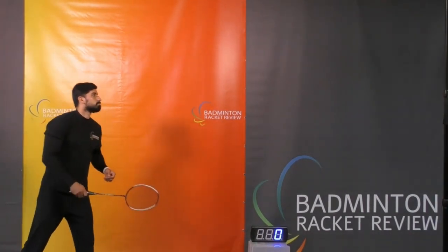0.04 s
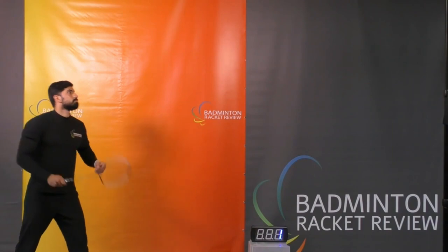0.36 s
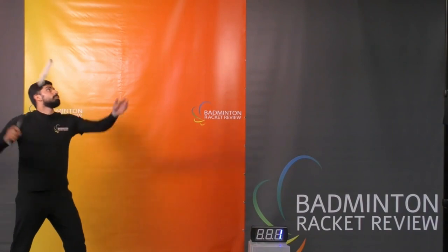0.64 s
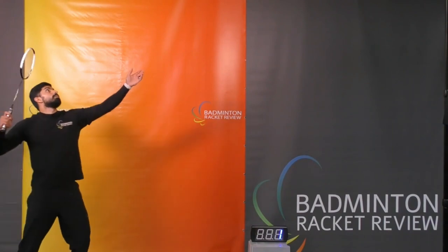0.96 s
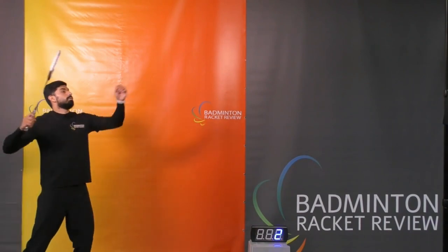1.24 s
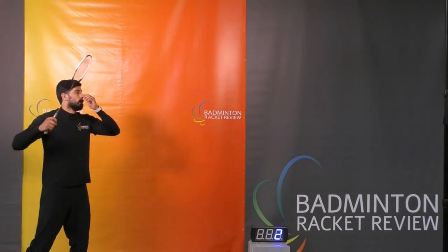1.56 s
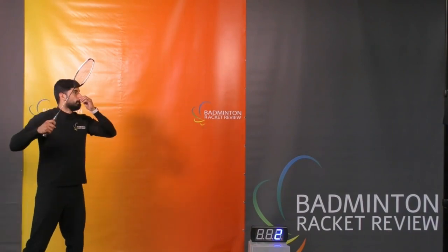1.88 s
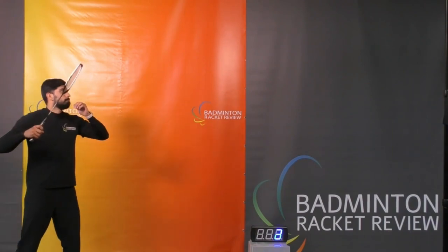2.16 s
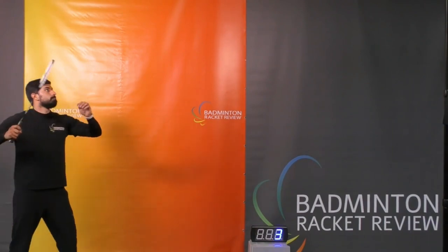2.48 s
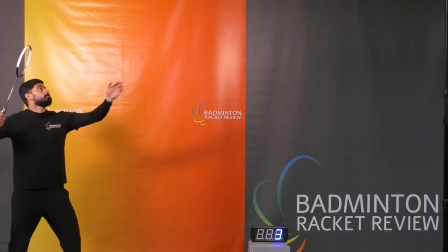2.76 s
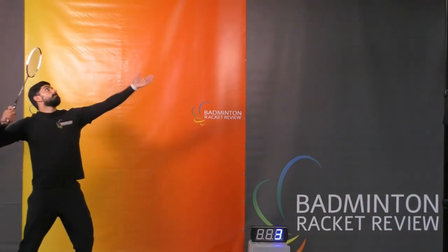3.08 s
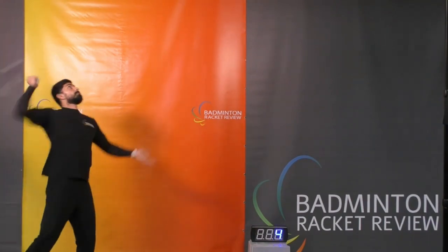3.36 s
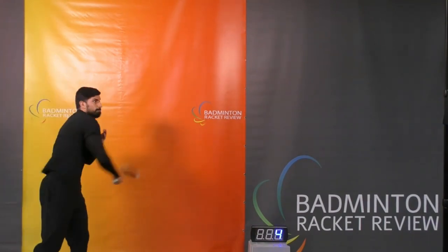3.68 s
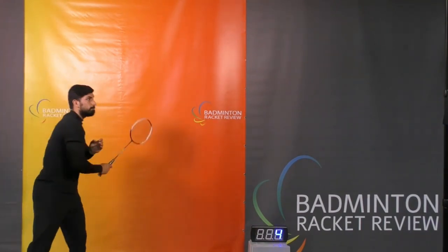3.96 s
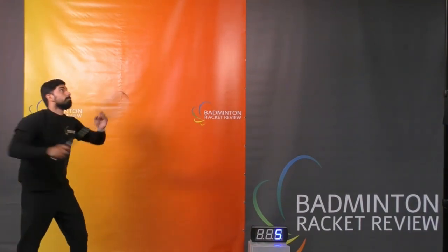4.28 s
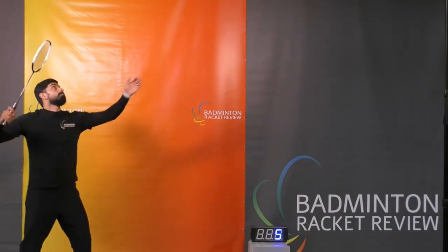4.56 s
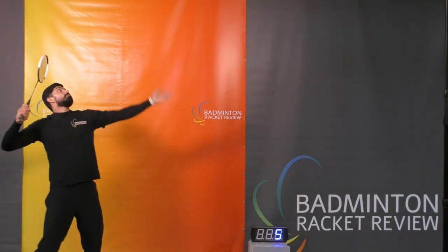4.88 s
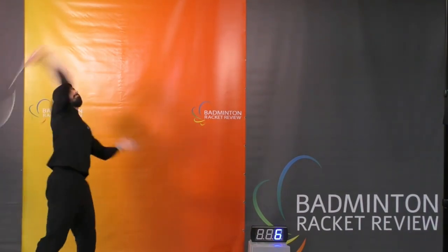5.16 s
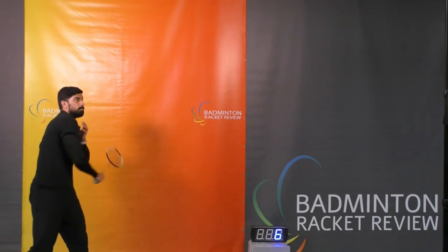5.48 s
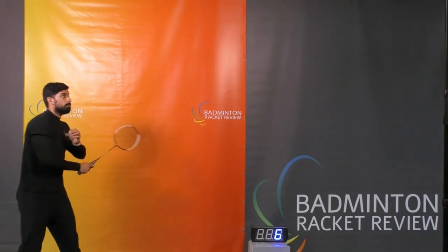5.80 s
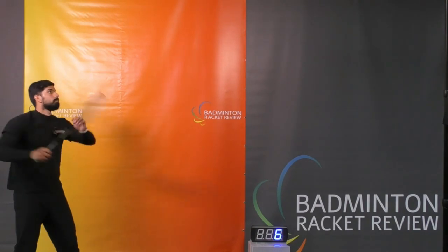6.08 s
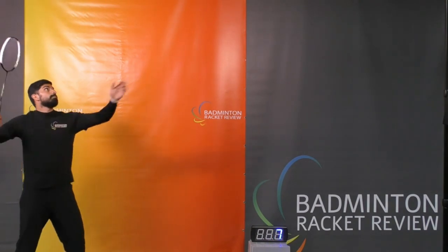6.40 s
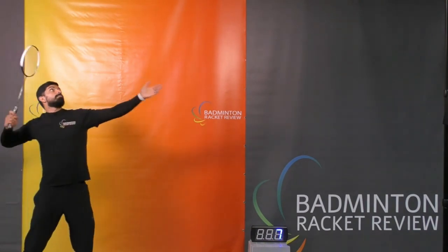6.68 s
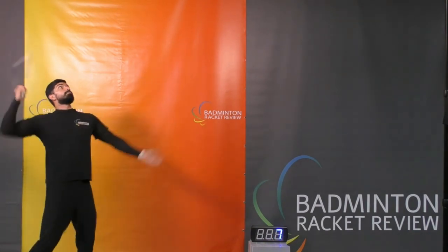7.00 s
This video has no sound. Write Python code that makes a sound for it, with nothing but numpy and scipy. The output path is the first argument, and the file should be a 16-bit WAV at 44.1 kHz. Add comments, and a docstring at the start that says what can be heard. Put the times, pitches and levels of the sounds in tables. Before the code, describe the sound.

A badminton player stamps on a sprung floor and cracks two loud smashes in a large, humming indoor hall.

```python
"""Ventilation hums in a large, echoing sports hall, and a badminton player stamps into position.
Footfalls excite the damped resonances of a sprung floor; a shuttle feeder whirrs, launches and clinks.
After a dull knock, the racket whistles by vortex shedding and cracks in two smashes; shuttles land.
Each crack overloads a close mono microphone, whose gain ducks and creeps back while the hall rings."""
import sys
import numpy as np
from scipy import signal
from scipy.fft import rfft, irfft, next_fast_len
from scipy.io import wavfile
from scipy.ndimage import uniform_filter1d

SR = 44100
rng = np.random.default_rng(int(sys.argv[2]) if len(sys.argv) > 2 else 0)


def inscribe(sig):
    """Save sig as 16-bit PCM at rate SR to the path in sys.argv[1].

    A 1-D sig is mono; a 2-D sig holds one channel per row.
    Samples are clipped to [-1, 1] before scaling.
    """
    pcm = np.round(np.clip(np.atleast_2d(sig).T, -1, 1) * 32767)
    wavfile.write(sys.argv[1], SR, pcm.astype(np.int16))


N = 319284
TIME = np.arange(N) / SR

# Spectra. Each row: frequency in Hz, relative level in dB.
VENT_SPECTRUM = [(20, -10), (55, -31), (85, -3.5), (125, 5.5), (200, 3), (310, -7.5), (400, -22.5),
                 (470, -31), (600, -32), (1100, -27), (2600, -18.5), (4200, -19.5), (5200, -23),
                 (6500, -25), (8000, -22), (9800, -19.5), (13000, -29), (16000, -41)]  # turbulent air from the fans
SOLE_SPECTRUM = [(200, 11), (450, -7), (1200, -1.5), (1800, -3.5), (2150, -9), (2600, -5), (3500, -7),
                 (6500, -6), (9500, 2.5), (12000, 0.5), (16000, -12.5)]  # a sole slapping the court
CRACK_SPECTRUM = [(200, -25), (470, 0.5), (720, -2), (1100, -8.5), (2400, 0), (3200, -1.5), (4100, 2.5),
                  (5400, -2), (6800, 3), (8200, 5), (10000, 9.5), (12500, 9), (16000, 4)]  # a sharp crack
HISS_SPECTRUM = [(40, 1), (200, 21), (450, -12), (700, 7), (1500, -2), (3500, 0), (6500, 3.5), (8200, 6),
                 (10500, 0), (14500, 8), (16000, -15)]  # air passing strings or feathers
CORK_SPECTRUM = [(60, -8), (170, 21), (400, 1.5), (850, -9.5), (1250, 15.5), (1500, 7), (1850, 11),
                 (2400, 9), (3000, -11), (4300, -1), (6000, -12), (10000, -12), (16000, -38)]  # cork striking the floor
RUBBER_SPECTRUM = [(300, -1), (700, 0.5), (1500, -2.5), (4000, 0), (6500, -1), (8500, 5), (11000, 6),
                   (13000, -1), (16000, -14)]  # rubber rubbing
WHEEL_SPECTRUM = [(1200, 2.5), (1900, 10), (2150, 21), (2550, 16.5), (3000, 1), (5000, -36)]  # the feeder's spinning wheels
RATTLE_SPECTRUM = [(1500, -10.5), (6700, -11), (7800, 0), (8600, -3), (9300, -3), (11000, -2.5),
                   (12300, -8), (13500, -15), (16000, -22)]  # a small metal part rattling
HALL_SPECTRUM = [(60, -35), (125, 3), (250, 3.5), (350, 5), (420, -3), (470, -12), (550, 0.5), (660, 9.5),
                 (820, -7.5), (1050, 5.5), (10000, 1), (15000, -2.5)]  # the reverberant field
# Reverberation time of the hall. Each row: frequency in Hz, T60 in seconds.
HALL_DECAY = [(120, 1.43), (400, 1.15), (1100, 2.89), (2300, 2.25), (4500, 1.66), (7000, 1.18),
              (10000, 0.84), (15000, 0.35)]
# Steady background drones of the hall. Each row: frequency in Hz, width in Hz, level in dB.
HALL_DRONES = [(133.2, 17.5, -41.5), (656, 196, -59), (1027, 120, -62), (2135, 56, -57.5), (3795, 270, -59)]
# Pings at the first stamp. Each row: start in seconds, frequency in Hz, level in dB, T60 in seconds.
STAMP_PINGS = [(0.2078, 2121, -25, .032), (0.2135, 1390, -27, .022)]
# Stamps that push the player back into position. Each row: start in seconds, level in dB.
FOOT_STAMPS = [(0.2086, -9), (2.3228, -9.5), (3.974, -12), (5.917, -8.5)]
# A thump's arrivals off floor and walls. Each row: delay in seconds, relative level in dB.
THUMP_PATHS = [(0, -3), (.0275, -6.5), (0.063, -5), (.0755, -9.5)]
# Soft low thuds: steps, and thuds with the feeder's launches and the last swing.
# Each row: centre in seconds, level in dB, pitch in Hz, half-width in seconds.
SOFT_THUDS = [(0.216, -25, 268, 0.0047), (0.98, -20, 203, 0.007), (1.337, -25, 133, 0.007),
              (1.678, -19.5, 157, 0.0074), (1.718, -20.5, 143.4, 0.011), (1.8465, -24.5, 179, 0.016),
              (3.5435, -22, 155, 0.01), (3.913, -24.5, 206, 0.021), (4.065, -21.5, 147.1, 0.013),
              (4.16, -28, 181, 0.006), (4.965, -29.5, 270, 0.0069), (5.028, -24.5, 150, 0.0091),
              (6.334, -25, 161, 0.022), (6.819, -29.5, 260, 0.0078), (7.226, -23, 188, 0.01)]
# Sharp cracks: first a duller knock close by, then two racket smashes.
# Each row: start in seconds, level in dB, decay in seconds (0.0006 at least is used),
# treble tilt in dB per octave, buzz in dB, hall level in dB, hall tilt in dB per octave,
# early reflections in dB, far-end swell as a ratio, reflection gap in seconds, bounce lag in seconds.
SHARP_CRACKS = [(0.7536, -18, 0.0083, -7, -27.5, -12.5, -5.5, -11, 0.59, 0.038, 0.0012),
                (3.575, 4, 0.00088, 8.5, -21, 2, 2.5, 4, 0.21, 0.02, 0.0012),
                (5.2950, 9, 0.00043, 4.5, -12.5, 1, -1.46, 8, 0.051, .0184, 0.00091)]
# Air displaced with each crack. Each row: centre in seconds, half-width in seconds,
# then suction, pressure and wake as signed amplitudes.
PRESSURE_PULSES = [(0.7595, 0.0012, 0.32, -2.13, -0.13), (3.5787, 0.00083, -0.083, 0.41, -0.26),
                   (5.2987, 0.0014, -0.18, 1.9, 0.88)]
# String-bed modes; in a smash the point of impact decides which speak. Each row: frequency in Hz,
# width in Hz, then lift in dB for the knock, the first smash and the second smash.
STRING_BED_MODES = [(1059, 110, 0, 23, 13), (1410, 69, -5, 25, 15.5), (1660, 120, -8, 7.3, 22),
                    (2104, 160, -10, 23, 6), (2420, 300, -14, 7.7, -3), (2830, 180, -8, 21, 14),
                    (3570, 100, -1, 16, -5), (4030, 210, 1, 1.7, 12), (4580, 200, -7, 13, 2),
                    (4804, 570, 11.5, 8.5, -1), (5380, 350, 10, 16, 19.5), (6060, 370, 6, 11, 5),
                    (6840, 400, 0, 10, 4), (8200, 730, 8, 9.7, 6), (9180, 980, -3, 6, 15),
                    (10280, 310, 7.5, 7.7, 1.5), (12200, 850, -5, 7, -16)]
# Shuttles landing near and far. Each row: start in seconds, level in dB,
# treble tilt in dB per octave, hall level in dB.
SHUTTLE_LANDINGS = [(0.95, -32, -3, -31.5), (1.8909, -18.5, -2, -20.5), (1.9004, -27, 23, -25),
                    (3.754, -56, -3, -13.5), (3.896, -38, -14, -13.5), (5.62, -66, 2.5, -19)]
# Modes of struck objects. Each row: frequency in Hz, relative level in dB, T60 in seconds.
CORK_RESONANCES = [(1380, -31, 0.02), (1803, -28, 0.033)]
METAL_RESONANCES = [(7920, 6, .12), (8400, -3, .16), (8530, 6, .2), (8670, -1, .16), (12200, 0, .2)]
# Feeder launches. Each row: start in seconds, hiss in dB, whirr in dB, time of peak whirr in seconds.
LAUNCHES = [(1.191, -36, -48.5, 1.33), (3.071, -31, -48, 3.12), (4.927, -29, -46, 4.87),
            (6.773, -30.5, -43.5, 6.76)]
# Clinks of the reloading feeder. Each row: start in seconds, rattle in dB, ring in dB.
RELOADS = [(1.629, -33.5, -38), (3.493, -35.5, -39), (5.343, -18, -48), (7.188, -34, -36)]
# Racket swings. Each row: time of top speed in seconds, level in dB, top pitch of the shaft in Hz.
RACKET_SWINGS = [(3.575, -22, 1130), (5.294, -20, 1100), (7.239, -21.5, 955)]


def amp(db):
    """Converts decibels to an amplitude ratio."""
    return 10 ** (np.asarray(db) / 20)


def unit_rms(x):
    """Normalises a signal to unit power."""
    return x / np.sqrt(np.mean(x ** 2) + 1e-20)


def curve(points, hz):
    """Interpolates a table along a logarithmic frequency axis."""
    f, value = np.transpose(points)
    return np.interp(np.log(hz + 1), np.log(f + 1), value)


def add(mix, s, sound):
    """Superposes a sound on the mix from s seconds on."""
    part = mix[round(s * SR):][:len(sound)]
    part += sound[:len(part)]


def gains(spectrum, size, tilt_db):
    """Frequency response per FFT bin, the treble tilted by tilt_db per octave."""
    hz = np.fft.rfftfreq(size, 1 / SR)
    return amp(curve(spectrum, hz) + tilt_db * np.log2(1 + hz / 2000))


def noise(spectrum, size, tilt_db=0):
    """White noise filtered to a given spectrum, at unit power."""
    white = rfft(rng.standard_normal(size))
    return unit_rms(irfft(white * gains(spectrum, size, tilt_db), size))


def click(spectrum, tilt_db=0, size=512):
    """A blow as the hall receives it: an impulse with the energy of one millisecond at full scale."""
    pulse = np.roll(irfft(gains(spectrum, size, tilt_db)), size // 16)
    return pulse / np.linalg.norm(pulse) * np.sqrt(.001 * SR)


def narrowband(hz, width):
    """Random modulation spreads a steady or gliding carrier into a band of noise."""
    size = next_fast_len(N)
    offset = np.fft.fftfreq(size, 1 / SR)
    band = np.exp(-2 * (offset / width) ** 2)
    waver = np.fft.ifft(np.fft.fft(rng.standard_normal(size)) * band)[:N]
    carrier = np.exp(2j * np.pi * np.cumsum(hz * np.ones(N)) / SR)
    return unit_rms((waver * carrier).real)


def burst(spectrum, decay_s, rise_s, tilt_db=0):
    """Exponentially decaying noise whose energy depends only on its envelope."""
    t = TIME[:SR // 2]
    envelope = (1 - np.exp(-t / rise_s)) * np.exp(-t / decay_s)
    return unit_rms(noise(spectrum, len(t), tilt_db) * envelope) * np.sqrt(np.mean(envelope ** 2))


def ringing(modes):
    """Free vibration: a sum of damped sinusoids."""
    t = TIME[:SR // 2]
    return sum(amp(db - 60 * t / t60) * np.sin(2 * np.pi * hz * t) for hz, db, t60 in modes)


def boom(s, hz, half_width_s, overtone=1.73, overtone_db=-17):
    """A heavily damped low resonance and its overtone, in a Gaussian envelope centred on time s."""
    out = np.zeros(N)
    start = max(s - .05, 0)
    t = TIME[:SR // 10] + start - s
    ring = np.cos(2 * np.pi * hz * t) + amp(overtone_db) * np.cos(2 * np.pi * hz * overtone * t)
    add(out, start, -ring * np.exp(-(t / half_width_s) ** 2))
    return out


def hall(x, gap_s, early_db=4, early_decay_s=0.015, swell=0):
    """Reverberation: dense early reflections, a slap and swell from the far end, a long uneven tail."""
    t = TIME[:SR * 5 // 2]
    early = amp(early_db) * np.exp(-t / early_decay_s)
    far_wall = amp(-5) * np.exp(-((t - 0.24) / 0.0043) ** 2)
    far_end = swell * np.exp(-((t - 0.28) / 0.092) ** 2)
    reflections = rng.standard_normal(len(t)) * (1 + early / 2 + far_wall / 2) * (1 + far_end)
    # each band wavers in level and decays at its own rate
    hz, when, bands = signal.stft(reflections, SR, nperseg=512)
    patches = uniform_filter1d(rng.standard_normal(bands.shape), size=3, axis=0)
    patches = unit_rms(uniform_filter1d(patches, size=14, axis=1))
    waver_db = 1.4 * patches * np.minimum(hz / 1000, 1)[:, None]
    decay_db = -60 * when / curve(HALL_DECAY, hz)[:, None]
    tail = signal.istft(bands * amp(waver_db + decay_db), SR, nperseg=512)[1][:len(t)]
    tail = irfft(rfft(tail) * gains(HALL_SPECTRUM, len(t), 0))
    tail *= np.minimum((t[-1] - t) / .5, 1) ** 2
    wet = np.zeros(N)
    add(wet, gap_s, signal.fftconvolve(x, tail)[:N] * np.sqrt(np.log(1e6) / SR))
    return wet


def ventilation(rush_db=-38.5, hum_hz=55.8, hum_db=-45.5, drift_db=2.5, drift_hz=2.5):
    """Fans radiate broadband noise and a steady tone; the hall's background drones waver slightly."""
    out = amp(rush_db) * noise(VENT_SPECTRUM, N)
    out += amp(hum_db) * unit_rms(np.sin(2 * np.pi * hum_hz * TIME))
    for hz, width, db in HALL_DRONES:
        drone = narrowband(hz, width) * amp(drift_db * narrowband(0, drift_hz))
        out += amp(db) * unit_rms(drone)
    return out


def pings(hall_db=-9):
    """Two quickly damped sinusoids sound as clear pings on the first stamp."""
    out = np.zeros(N)
    for s, hz, db, t60 in STAMP_PINGS:
        add(out, s, ringing([(hz, db, t60)]))
    return out + amp(hall_db) * hall(out, gap_s=.019)


def stamps(slap_db=-11.5, thump_hz=162, lag_s=0.026, thump_s=0.0073, slap_hall_db=-6, thump_hall_db=-3):
    """Impact excitation: a sole slaps, and the sprung floor's thump echoes between floor and walls."""
    out, thumps = np.zeros((2, N))
    for s, db in FOOT_STAMPS:
        slap = np.zeros(N)
        add(slap, s, amp(db) * click(SOLE_SPECTRUM))
        add(out, s, amp(db + slap_db) * burst(SOLE_SPECTRUM, 0.016, 0.0024))
        out += amp(slap_hall_db) * hall(slap, gap_s=.019)  # each spot has its own echo
        thumps += amp(db) * boom(s + lag_s, thump_hz, thump_s / 2)
        for delay, echo_db in THUMP_PATHS:
            out += amp(db + echo_db) * boom(s + lag_s + delay, thump_hz, thump_s)
    return out + amp(thump_hall_db) * hall(thumps, gap_s=.03)


def thuds_and_scuff(scuff_s=1.833, scuff_db=-27, scuff_hall_db=-2, thud_hall_db=-6):
    """Damped low resonances sound as soft thuds; friction makes one scuff as a sole catches."""
    thuds = sum(amp(db) * boom(s, hz, width, overtone_db=-22) for s, db, hz, width in SOFT_THUDS)
    scuff = np.zeros(N)
    add(scuff, scuff_s, amp(scuff_db) * burst(RUBBER_SPECTRUM, 0.005, 0.0011))
    scuff += amp(scuff_hall_db) * hall(scuff, gap_s=0.012)
    return scuff + thuds + amp(thud_hall_db) * hall(thuds, gap_s=0.01617)


def cracks(buzz_s=0.014, scatter_db=-13, wall_db=-21, bounce_db=-18, push_hall_db=-13, ring_share=0.45):
    """Impulsive excitation: a dull close knock, then two smashes where strings ring and feathers buzz."""
    out = np.zeros(N)
    buzz = signal.windows.tukey(round(buzz_s * SR), .5)
    for crack, pulse, lifts_db in zip(SHARP_CRACKS, PRESSURE_PULSES, np.transpose(STRING_BED_MODES)[2:]):
        s, db, decay, tilt_db, buzz_db, hall_db, hall_tilt_db, early_db, swell, gap, lag = crack
        near, spread = np.zeros((2, N))
        add(near, s, amp(db) * burst(CRACK_SPECTRUM, max(decay, .0006), .0003, tilt_db))
        add(near, s + 0.0011, amp(buzz_db) * buzz * noise(HISS_SPECTRUM, len(buzz), tilt_db))
        # floor and backdrop scatter a little sound into the gap, then the nearest wall reflects it
        add(near, s, amp(buzz_db + scatter_db) * burst(CRACK_SPECTRUM, .015, .003, tilt_db))
        wall_slap = burst(CRACK_SPECTRUM, .008, .001, hall_tilt_db)
        add(near, s + gap, amp(hall_db + early_db + wall_db) * wall_slap)
        # interference with a dull near bounce makes the tail hollow
        add(spread, s, amp(hall_db) * click(CRACK_SPECTRUM, hall_tilt_db))
        add(spread, s + lag, amp(hall_db + bounce_db) * click(CRACK_SPECTRUM, tilt_db=-13))
        air = air_push(*pulse)
        into_hall = string_bed(spread, ring_share * lifts_db) + amp(push_hall_db) * air
        out += air + string_bed(near, lifts_db) + hall(into_hall, gap, early_db, swell=swell)
    return out


def string_bed(x, lifts_db):
    """Parallel resonators: each mode lifts or cuts its own band and rings on briefly."""
    out = x.copy()
    for (hz, width, *_), db in zip(STRING_BED_MODES, lifts_db):
        out += (amp(db) - 1) * signal.lfilter(*signal.iirpeak(hz, hz / width, fs=SR), x)
    return out


def air_push(s, half_width_s, suction, pressure, wake):
    """Displaced air arrives as a pressure pulse between a brief suction and a trailing wake."""
    u = (TIME - s) / half_width_s
    before = suction * np.exp(-(u + 2.23) ** 2)
    after = wake * np.exp(-((u - 2.9) / 0.91) ** 2)
    return before + pressure * np.exp(-u ** 2) + after


def landings(ring_db=-3, thud_db=-5, thud_hz=195):
    """Cork knocks, thuds and rings on the floor; at a distance the reverberant field dominates."""
    knocks, spread = np.zeros((2, N))
    ring = ringing(CORK_RESONANCES)
    for s, db, tilt_db, hall_db in SHUTTLE_LANDINGS:
        add(knocks, s, amp(db) * (burst(CORK_SPECTRUM, 0.0052, 0.00028, tilt_db) + ring))
        knocks += amp(db + thud_db) * boom(s + 0.0026, thud_hz, 0.0079)
        add(spread, s, amp(hall_db) * click(CORK_SPECTRUM, tilt_db))
        add(spread, s, amp(db + ring_db) * ring)
    return knocks + amp(-2.5) * hall(spread, gap_s=0.011, early_db=2, early_decay_s=0.063)


def feeder(knock_db=-1, knock_hz=156, knock_lag_s=0.02624, whirr_half_s=0.18):
    """Wheels grip a shuttle by friction with a hiss and a soft knock; their whirr swells and fades."""
    launches, whirr_level = np.zeros((2, N))
    for s, db, whirr_db, whirr_s in LAUNCHES:
        add(launches, s, amp(db) * burst(RUBBER_SPECTRUM, 0.043, 0.0059))
        launches += amp(db + knock_db) * boom(s + knock_lag_s, knock_hz, 0.0031)
        whirr_level += amp(whirr_db) * np.exp(-((TIME - whirr_s) / whirr_half_s) ** 2)
    wheels = noise(WHEEL_SPECTRUM, N) + noise(RUBBER_SPECTRUM, N)
    return launches + whirr_level * wheels + hall(launches, gap_s=.015)


def clinks(rise_s=0.016, rattle_decay_s=0.065, hall_db=-4):
    """A small metal part rattles and rings in its natural modes each time the feeder reloads."""
    out = np.zeros(N)
    ring = ringing(METAL_RESONANCES)
    ring *= np.minimum(TIME[:len(ring)] / rise_s, 1)
    for s, rattle_db, ring_db in RELOADS:
        add(out, s, amp(rattle_db) * burst(RATTLE_SPECTRUM, rattle_decay_s, rise_s / 2, tilt_db=2))
        add(out, s, amp(ring_db) * ring)
    return out + amp(hall_db) * hall(out, gap_s=0.017)


def swings(rise_s=0.019, fall_s=.004, strings_hz=11070,
           rush_db=-1, strings_db=-3, shaft_db=-4, buffet_db=-8, hall_db=-14):
    """Vortex shedding: shaft and strings whistle higher with speed; turbulence adds rush and buffet."""
    hiss, body = np.zeros((2, N))
    rush = noise(HISS_SPECTRUM, N)
    buffet = narrowband(190, width=100)  # air churned by the arm and the frame
    for s, db, shaft_hz in RACKET_SWINGS:
        force = np.exp(-np.maximum((s - TIME) / rise_s, (TIME - s) / fall_s) ** 1.2)
        speed = force ** .25
        turbulence = force ** 1.14
        hiss += amp(db + rush_db) * turbulence * rush
        hiss += amp(db + strings_db) * force * narrowband(strings_hz * np.sqrt(speed), width=2600)
        body += amp(db + shaft_db) * force * narrowband(shaft_hz * speed, width=540)
        body += amp(db + buffet_db) * turbulence * buffet
    return hiss + body + amp(hall_db) * hall(hiss, gap_s=0.072)


def scene():
    """Superposition of all sources at one microphone, alike in both channels."""
    mono = cracks() + swings() + stamps() + pings() + thuds_and_scuff()
    mono += feeder() + clinks() + landings() + ventilation()
    return np.array([mono, mono])


def peak_hold(level, release_s):
    """Envelope detection: each peak of a positive level decays exponentially."""
    return np.exp(np.maximum.accumulate(np.log(level) + TIME / release_s) - TIME / release_s)


def record(dry, threshold_db=-16, attack_s=.006, fast_s=0.41, slow_s=2.3, ceiling=.64, edge_hz=15950):
    """Automatic gain control, too slow for the cracks, followed by saturation and a band limit."""
    sensed = signal.lfilter(*signal.butter(1, 600, "high", fs=SR), dry[0])  # the detector ignores bass
    window = np.hanning(176)
    power = signal.lfilter(window / window.sum(), 1, sensed ** 2)
    over_db = np.maximum(10 * np.log10(power + 1e-12) - threshold_db, 1e-6)
    # the gain recovers quickly at first, then slowly
    duck_db = np.maximum(peak_hold(over_db, fast_s), 0.27 * peak_hold(over_db, slow_s))
    pole = np.exp(-1 / (attack_s * SR))
    ducked = dry * amp(-signal.lfilter([1 - pole], [1, -pole], duck_db))
    oversampled = signal.resample_poly(ducked, 2, 1, axis=1)
    saturated = oversampled / (1 + (oversampled / ceiling) ** 4) ** .25
    lowpass = signal.firwin(511, edge_hz, window=("kaiser", 9), fs=SR)
    return signal.oaconvolve(signal.resample_poly(saturated, 1, 2, axis=1), lowpass[None], "same")


dry = scene()
out = record(dry)
inscribe(out)
```